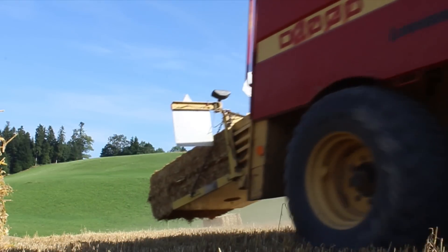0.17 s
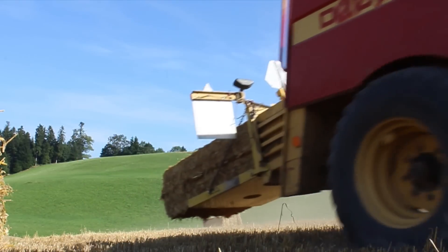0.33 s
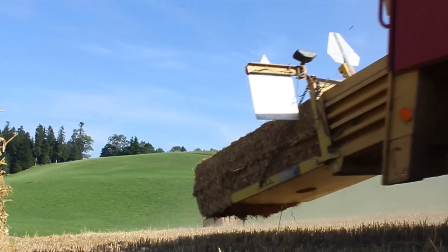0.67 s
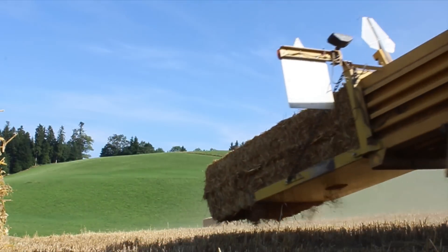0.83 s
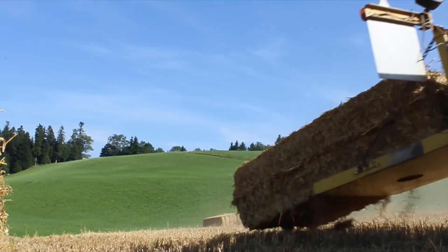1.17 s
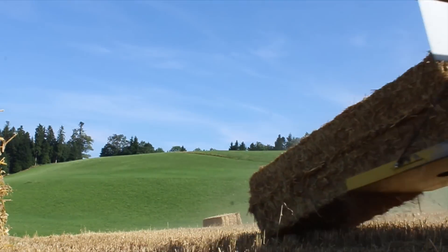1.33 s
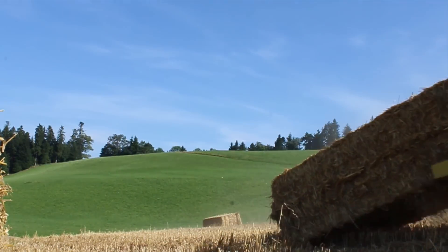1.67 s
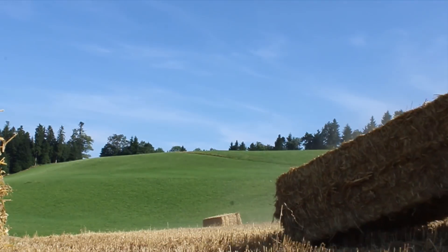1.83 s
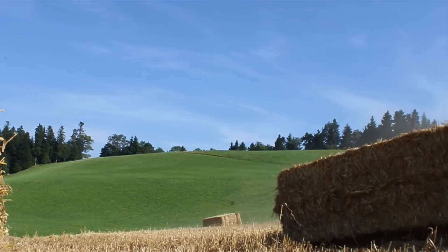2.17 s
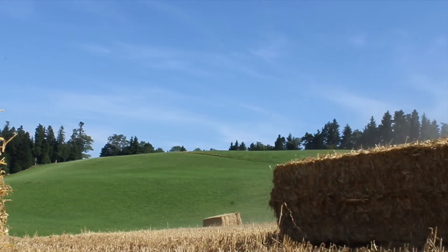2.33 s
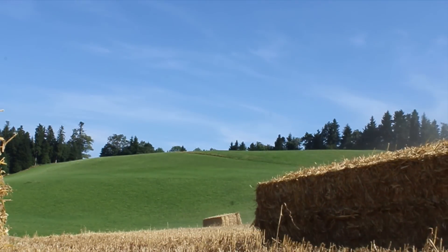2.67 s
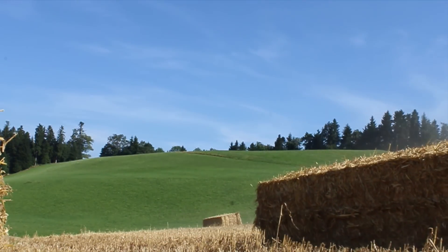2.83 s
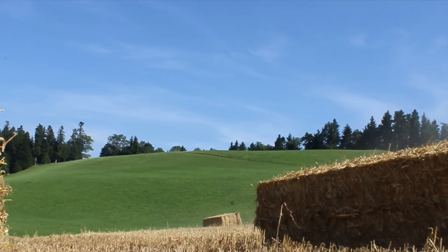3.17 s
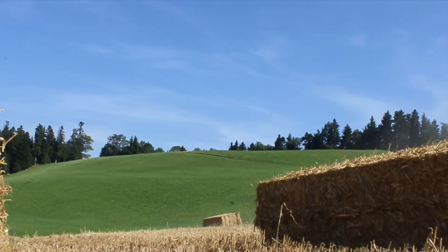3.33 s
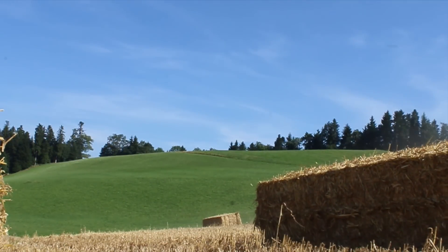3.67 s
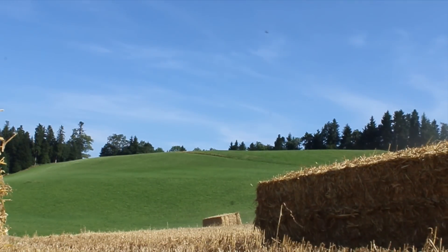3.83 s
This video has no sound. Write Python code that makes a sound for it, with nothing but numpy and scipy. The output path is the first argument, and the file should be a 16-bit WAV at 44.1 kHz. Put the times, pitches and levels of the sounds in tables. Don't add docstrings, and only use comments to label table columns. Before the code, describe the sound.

A square baler towed by a tractor rumbles past very close, with rapid frame thumps, hollow booms and steel clatter; a chute flap slams, then the drone recedes with irregular metallic ticks. Open field, near-mono microphone, faint hiss.

```python
import sys
import numpy as np
from scipy import signal
from scipy.fft import rfft, irfft, next_fast_len
from scipy.io import wavfile
from scipy.ndimage import uniform_filter1d, map_coordinates

SR = 44100
rng = np.random.default_rng(int(sys.argv[2]) if len(sys.argv) > 2 else 0)


def master_out(mix):
    frames = np.transpose(np.atleast_2d(mix))
    ceiling = np.clip(frames, -1, 1)
    pcm = np.round(ceiling * 32767).astype(np.int16)
    wavfile.write(sys.argv[1], SR, pcm)


def boost_factor(decibels):
    exponent = np.asarray(decibels, float) / 20
    return 10 ** exponent


N = 176400
T = np.arange(N) / SR

# time_s, level_db
RUMBLE_LEVEL = [(0, -22), (.12, -25), (.45, -25.5), (.62, -24), (.8, -24.5), (.9, -26.5), (1.3, -31),
                (1.7, -36.5), (1.95, -34.5), (2.2, -36), (2.32, -37.5), (2.9, -42), (3.25, -44),
                (3.55, -43.5), (3.75, -45.5), (4, -48)]
# time_s, firing_hz
ENGINE_SPEED = [(0, 101.9), (.22, 95.3), (.45, 103.7), (.6, 98), (.76, 101.2), (.92, 95), (1.05, 108.9),
                (1.4, 108), (1.55, 101.1), (2.1, 101), (2.9, 104.1), (4, 101)]
CYLINDER_DB = [0, -2, 1, -3, 1.5, -1]
# firing_multiple, over_rumble_db, unsteadiness_db
ENGINE_ORDERS = [
    (1, -12.5, 2.5),
    (1.5, -16, 2.5),
    (3, -17, 2.2),
]
# pitch_hz, over_rumble_db, gain_db_per_s, unsteadiness_db
GEAR_MESH = [
    (271, -10.5, 1.5, 3),
    (571, -27.5, 3, 5),
    (240.7, -9.5, 0.7, 0),
    (481.4, -23.5, 2.5, 2),
]
# freq_hz, density_db
RUMBLE_SPECTRUM = [(18, -62), (30, -52), (86, -1), (221, -1.5), (321, -2), (379, -4.5), (710, -10.5),
                   (1730, -28.5), (2500, -28.5), (3250, -53), (5500, -120)]
# start_s, peak_db, pitch_hz, length_s
CHAMBER_BOOMS = [(0, -20, 187.3, 0.1), (.02, -26, 282.7, 0.21), (.14, -30, 95.4, 0.23),
                 (.26, -25, 257.5, 0.091), (.4, -29, 102.4, 0.33), (.55, -30.5, 150, 0.18),
                 (1.2, -38, 150.5, 0.27), (.4, -35, 800, .08), (.45, -24, 220.3, 0.31),
                 (.48, -26, 160.3, 0.15), (.68, -27.5, 291.7, 0.2177), (.68, -26.5, 375.7, 0.2),
                 (.72, -23, 225.2, 0.18), (2.8, -51, 65.6, .1)]
# time_s, level_db
CLATTER_LEVEL = [(0, -35), (.2, -37), (.5, -39.5), (.82, -40.5), (1.1, -43.5), (1.45, -45), (1.78, -47.5),
                 (1.92, -50), (2.08, -43), (2.22, -49.5), (2.32, -51.5), (2.55, -51), (2.8, -53),
                 (3.2, -56), (3.4, -52), (3.52, -52), (3.64, -56.5), (3.7, -58.5), (4, -62.5)]
# center_hz, width_hz, level_db
CASING_PANELS = [(2490, 930, -4.5), (3578, 600, 4), (4530, 1640, -16), (1360, 1100, -21),
                 (6500, 2900, -16.5)]
# freq_hz, density_db
CHUTE_SPECTRUM = [(700, -33), (1400, -8), (2000, 2), (2600, 5.5), (3700, 4), (4600, 0.6), (6500, -8.5),
                  (11000, -22.5)]
# start_s, peak_db, bass_over_peak_db, treble_over_peak_db, length_s
CASING_KNOCKS = [(.0, -22, -24, -22, 0.11), (0.132, -25, 10, -24, 0.057), (0.294, -27.5, 6.5, -23, 0.058),
                 (0.503, -22.5, 2, -20, 0.069), (0.625, -26.5, 7.5, -22, 0.071), (0.658, -30, -3, -18, .05),
                 (0.776, -29, 11.5, -15, 0.051), (0.861, -30, 8.5, -22, 0.046), (0.93, -33.5, 1, -6, 0.047),
                 (1.25, -36.5, -11, 6, 0.022), (1.4, -49, -10, 6, 0.14), (1.623, -47, -6, 7, 0.043),
                 (2.05, -38, -11, -8, 0.062), (2.163, -36, 8, -23, 0.096), (2.261, -47, 11, -6, 0.025),
                 (2.875, -49, -4, 0, 0.021), (3.608, -45.5, 5, -17, 0.038)]
# start_s, peak_db, t60_s, treble_over_peak_db
CHUTE_SLAMS = [(1.139, -29, .12, -6.5), (1.147, -34, 0.16, -12), (.92, -41, .053, -12),
               (.335, -34, 0.096, -25), (.8612, -34.5, 0.053, -25), (.137, -34, 0.046, -25),
               (.523, -30, 0.046, -14), (0.49, -35, 0.043, -16), (.684, -32.5, 0.047, -20),
               (.784, -39, .09, -25), (1.131, -32, .04, -25)]
# freq_hz, density_db
THUD_SPECTRUM = [(200, -10), (500, 0.0), (1300, -11.5), (2300, -22.5), (3500, -43)]
# start_s, peak_db, pitch_hz, length_s
BEARING_SQUEAKS = [(.0, -34.5, 7900, 0.013), (0.039, -34, 7980, .04), (.095, -44, 7850, .035),
                   (.36, -48, 14950, .03), (.42, -53, 14850, .03), (0.774, -42, 7760, .035),
                   (0.817, -48, 8000, 0.047), (0.873, -47, 8100, 0.038), (.945, -46, 8120, 0.039),
                   (.995, -46.5, 8230, 0.038), (1.105, -46, 7750, 0.065), (1.8, -49, 7710, 0.026),
                   (2.08, -56, 7600, .04), (3.62, -63, 8000, .05), (2.538, -59, 7630, 0.024),
                   (2.638, -55.5, 7920, .03), (2.695, -60, 8000, .025), (2.76, -55, 8000, .03),
                   (2.806, -55.5, 8300, 0.041), (.685, -44, 6500, .02), (.14, -41, 6200, .02)]
# time_s, level_db
STRAW_LEVEL = [(0, -44), (.9, -51), (1.3, -52.5), (2.2, -56), (2.5, -61.5), (4, -75)]
# freq_hz, density_db
STRAW_SPECTRUM = [(3000, -36), (5000, -1), (8000, -1), (11000, -6), (15500, -10.5)]
# start_s, peak_db, pitch_hz, t60_s
FRAME_THUMPS = [(.082, -17, 330, .04), (.114, -26, 370, .04), (.151, -18.5, 322, .05),
                (.189, -28, 400, 0.037), (.227, -23, 443, 0.036), (.404, -22, 415, 0.048),
                (.457, -20, 333, .04), (.5235, -18, 643, 0.043), (.645, -22.5, 347, .04),
                (.737, -23, 380, .04), (.783, -21, 403, .05), (.808, -16, 330, 0.033),
                (.815, -21, 445, 0.05), (.861, -18, 418, 0.034), (.881, -26, 350, .04),
                (1.057, -22.5, 458, 0.033), (1.097, -15.5, 247, 0.033), (1.178, -26, 496, 0.037),
                (1.312, -42, 453, .04), (1.954, -35, 476, 0.036), (.7846, -31, 1606, .05),
                (0.8622, -36, 1150, .03)]
# pitch_multiple, level_db
FRAME_PARTIALS = [(1, 0.5), (1.62, -9), (2.45, -13.5)]
# pitch_hz, level_db, t60_s
FLAP_MODES = [(2050, -5, .05), (2573, -2, .05), (3144, -6, .05), (3483, -2, .05), (3941, -4, .05),
              (4382, -1, .05), (4570, 0, .04), (5168, -8, .05), (5760, -11, .05), (6191, -14, .05)]
# start_s, level_per_mode_db
FLAP_BOUNCES = [
    (1.1388, -31),
    (1.1461, -33),
    (1.153, -38),
    (1.162, -41),
    (1.172, -41),
]
# start_s, peak_db
TINE_STRIKES = [(0.9832, -20.5), (1.3643, -40), (1.491, -24), (1.5234, -32), (1.5694, -40), (1.6127, -44),
                (1.6921, -36), (1.7345, -25), (1.8512, -38), (1.9869, -26), (2.0747, -30), (2.1094, -34.5),
                (2.1694, -29), (2.3545, -31.5), (2.4813, -30.5), (2.5994, -36.5), (2.77, -34),
                (2.8384, -47), (2.9577, -34.5), (3.0799, -32.5), (3.4094, -40), (3.6137, -34)]
# pitch_hz, level_db, t60_s
GUARD_MODES = [(3134, -2, 0.029), (3666, 1.5, 0.045), (3980, -7, 0.048), (2650, -13, 0.023)]
# freq_hz, density_db
HISS_SPECTRUM = [(35, 1), (100, -13), (600, -6), (2000, -12.5), (4500, -10), (9000, -8.5), (15700, -10)]
# freq_hz, density_db
PORT_BASS_SPECTRUM = [(20, -3), (60, -9), (300, -9), (1200, -14)]


def unit(x):
    return x / np.sqrt(np.mean(x ** 2) + 1e-20)


def along(points, hz):
    f, v = np.transpose(points)
    return boost_factor(np.interp(np.log(hz + 1), np.log(f + 1), v))


def curves(rows):
    s, *cols = np.transpose(rows)
    return [np.interp(T, s, c) for c in cols]


def wobble(rate_hz):
    return map_coordinates(rng.standard_normal(int(N * rate_hz / SR) + 4), [T * rate_hz])


def filtered(x, response):
    m = next_fast_len(N + SR // 2)
    return irfft(rfft(x, m) * response(np.fft.rfftfreq(m, 1 / SR)), m)[..., :N]


def shaped_noise(spectrum):
    return unit(filtered(rng.standard_normal(N), lambda hz: along(spectrum, hz)))


def patchy(patchy_db):
    z = signal.stft(rng.standard_normal(N), nperseg=512)[2]
    field = uniform_filter1d(rng.standard_normal(z.shape), 5, 0)
    field = uniform_filter1d(field, 10, 1)
    return signal.istft(z * boost_factor(patchy_db * unit(field)), nperseg=512)[1][:N]


def ticks(rate_hz, spread_db):
    decay_s, size_cap = .003, 3
    count = int(rate_hz * N / SR)
    when, size = rng.random(count), rng.exponential(size=count)
    spikes = np.bincount((when * N).astype(int), boost_factor(spread_db * np.minimum(size, size_cap)), N)
    envelope = np.convolve(spikes, np.exp(-T[:SR // 50] / decay_s))[:N]
    return unit(envelope * rng.standard_normal(N))


def swells(rows, rise, jitter):
    out = np.zeros(N + SR)
    for s, db, hz, length_s in rows:
        a, u = round(s * SR), np.linspace(0, 1, round(length_s * SR))
        pitch_hz = hz * (1 + rise * (u - .5)) * jitter[a:a + len(u)]
        phase = 2 * np.pi * np.cumsum(pitch_hz) / SR
        out[a:a + len(u)] += boost_factor(db) * np.sin(np.pi * u) ** 2 * np.sin(phase)
    return out[:N]


def drive():
    firing_drift, pulse_db, pulse_scatter_db = 0.00807, -23, 3
    rumble_db, dulling_db_per_s = -0.5, -1.5
    turns = np.cumsum(curves(ENGINE_SPEED)[0] * (1 + firing_drift * wobble(3))) / SR
    at = np.flatnonzero(np.diff(np.floor(turns)))
    scatter = np.tanh(rng.standard_normal(N // 100)[:len(at)])
    pulses = np.zeros(N)
    pulses[at] = boost_factor(np.resize(CYLINDER_DB, len(at)) + pulse_scatter_db * scatter)

    firing = boost_factor(pulse_db) * unit(uniform_filter1d(pulses, size=60))
    body = unit(filtered(firing + patchy(patchy_db=2.0), lambda hz: along(RUMBLE_SPECTRUM, hz)))
    upper = filtered(body, lambda hz: hz ** 2 / (hz ** 2 + 800 ** 2))
    body = body + (boost_factor(dulling_db_per_s * (T - 2.5)) - 1) * upper

    orders = sum(boost_factor(db + loose_db * wobble(8.23)) * np.sin(2 * np.pi * k * turns)
                 for k, db, loose_db in ENGINE_ORDERS)
    mesh = sum(boost_factor(db + gain * (T - 0.5) + loose_db * wobble(11))
               * np.sin(2 * np.pi * hz * T + 1.68 * wobble(12))
               for hz, db, gain, loose_db in GEAR_MESH)
    level = boost_factor(curves(RUMBLE_LEVEL)[0] + 0.27 * wobble(7.9))
    return level * (boost_factor(rumble_db) * body + orders + mesh)


def chamber():
    return swells(CHAMBER_BOOMS, 0.033, 1 + 0.022 * wobble(25.1))


def panels(f):
    return sum((-1) ** k * boost_factor(db) * 1j * f * w / (c * c - f * f + 1j * f * w)
               for k, (c, w, db) in enumerate(CASING_PANELS))


def clatter():
    waves_db, wash_db = 1.2, 2.5
    near_db, near_fade_db_per_s = 0.5, -6.5
    hits = boost_factor(waves_db * wobble(14)) * ticks(1000, 1.5) + boost_factor(wash_db) * patchy(patchy_db=0.0)
    casing = unit(filtered(hits, lambda hz: panels(hz) / (1 + (hz / 6500) ** 4)))
    bare = boost_factor(1.2 * wobble(22.05)) * ticks(440, 0.81)
    bare = unit(filtered(bare, lambda hz: along(CHUTE_SPECTRUM, hz * 1.8)))
    near = boost_factor(near_db + near_fade_db_per_s * T)
    return boost_factor(curves(CLATTER_LEVEL)[0]) * (casing + near * bare)


def knocks():
    knock_db, rise_share, slam_rise_s = -13, 0.33, .0015
    low, mid, high = np.zeros((3, N + SR))
    t = T[:SR // 4]
    for s, db, bass_db, treble_db, length_s in CASING_KNOCKS:
        u = t / (rise_share * length_s)
        for lane, lane_db in ((low, bass_db), (mid, 0), (high, treble_db)):
            lane[round(s * SR):][:len(t)] += boost_factor(db + knock_db + lane_db) * u * np.exp(1 - u)
    for s, db, t60_s, treble_db in CHUTE_SLAMS:
        for lane, lane_db in ((mid, 0), (high, treble_db)):
            decay = boost_factor(db + lane_db - 60 * t / t60_s)
            lane[round(s * SR):][:len(t)] += decay * (1 - np.exp(-t / slam_rise_s))
    rattle = 1 + 0.16 * np.abs(wobble(250))
    thud = shaped_noise(THUD_SPECTRUM)
    steel = shaped_noise(CHUTE_SPECTRUM)
    fizz = rng.standard_normal(N) + 0.88 * ticks(1600, 1.5)
    fizz = unit(filtered(fizz, lambda hz: along(STRAW_SPECTRUM, hz)))
    return rattle * (low[:N] * thud + mid[:N] * steel + high[:N] * fizz)


def squeaks():
    return swells(BEARING_SQUEAKS, .012, 1 + .016 * wobble(260))


def straw():
    crackle = boost_factor(0.81 * wobble(19)) * (ticks(1400, 6.5) + 1.7 * patchy(patchy_db=1.2))
    return boost_factor(curves(STRAW_LEVEL)[0]) * unit(filtered(crackle, lambda hz: along(STRAW_SPECTRUM, hz)))


def thumps():
    roughness, detune, bass_cut_hz = .6, .04, 150
    out, t = np.zeros(N + SR), T[:SR // 8]
    rows = [(s, db + level_db, hz * k, t60_s)
            for s, db, hz, t60_s in FRAME_THUMPS for k, level_db in FRAME_PARTIALS]
    rows += [(s, db + level_db, hz, t60_s)
             for s, db in FLAP_BOUNCES for hz, level_db, t60_s in FLAP_MODES]
    flutter = 1 + roughness * wobble(900)
    chances = np.tanh(rng.standard_normal((len(rows), 2)))
    for (s, db, hz, t60_s), (a, b) in zip(rows, chances):
        decay = boost_factor(db + 2 * a - 60 * t / t60_s)
        out[round(s * SR):][:len(t)] += decay * np.sin(2 * np.pi * hz * (1 + detune * b) * t)
    return filtered(out[:N] * flutter, lambda hz: (1j * hz / (bass_cut_hz + 1j * hz)) ** 2)


def strikes():
    strike_db, rise_s = -7, 0.0027
    out, t = np.zeros(N + SR), T[:SR // 12]
    chances = rng.standard_normal((len(TINE_STRIKES), 8))
    for (s, db), chance in zip(TINE_STRIKES, chances):
        ring = sum(boost_factor(level_db + 2.3 * chance[k] - 60 * t / t60_s)
                   * np.sin(2 * np.pi * hz * (1 + 0.016 * chance[-1 - k]) * t)
                   for k, (hz, level_db, t60_s) in enumerate(GUARD_MODES))
        out[round(s * SR):][:len(t)] += boost_factor(db + strike_db) * ring * (1 - np.exp(-t / rise_s))
    return out[:N] * (1 + 0.16 * wobble(900))


def scene():
    mono = drive() + chamber() + clatter() + knocks() + squeaks() + straw() + thumps() + strikes()
    return np.array([mono, mono])


def top_cut(x):
    return signal.sosfilt(signal.butter(12, 16790, fs=SR, output="sos"), x)


def record(dry):
    hiss_db, hiss_fade_db_per_s, mismatch_db, top_hz = -55, -1, -33, 15790
    hiss = unit(filtered(rng.standard_normal((2, N)), lambda hz: along(HISS_SPECTRUM, hz)))
    own = unit(filtered(rng.standard_normal((2, N)), lambda hz: along(PORT_BASS_SPECTRUM, hz)))
    own = boost_factor(mismatch_db + curves(RUMBLE_LEVEL)[0] + 8.1 * wobble(14)) * own
    mix = dry + own + boost_factor(hiss_db + hiss_fade_db_per_s * T) * hiss
    return top_cut(filtered(mix, lambda hz: hz < top_hz))


dry = scene()
out = record(dry)
master_out(out)
```